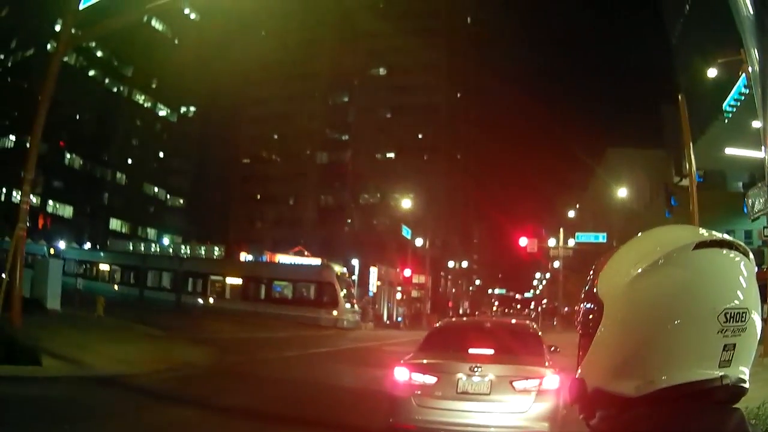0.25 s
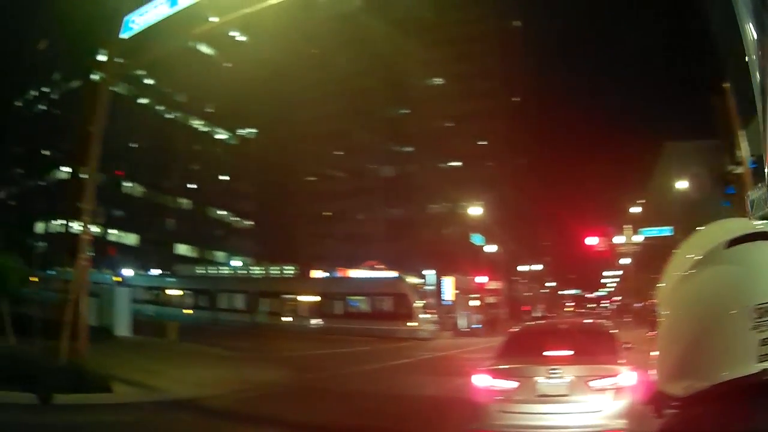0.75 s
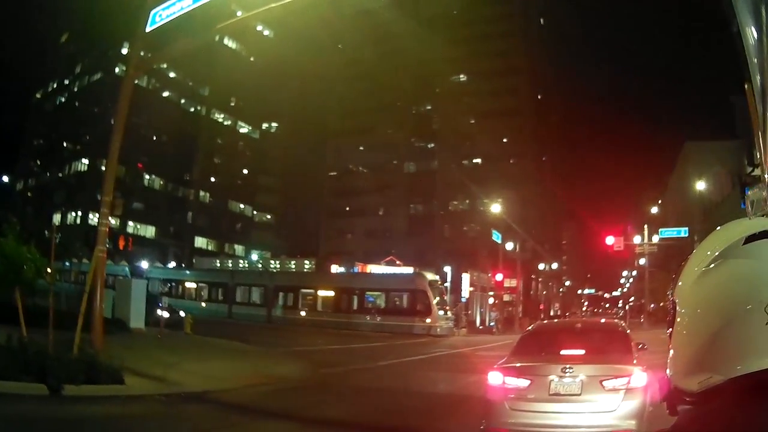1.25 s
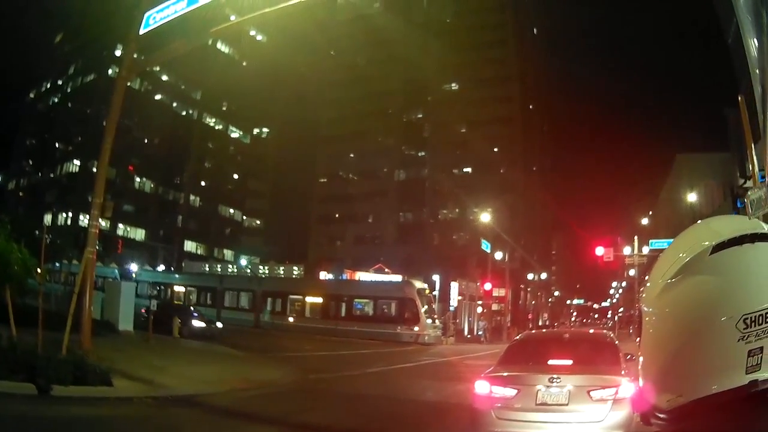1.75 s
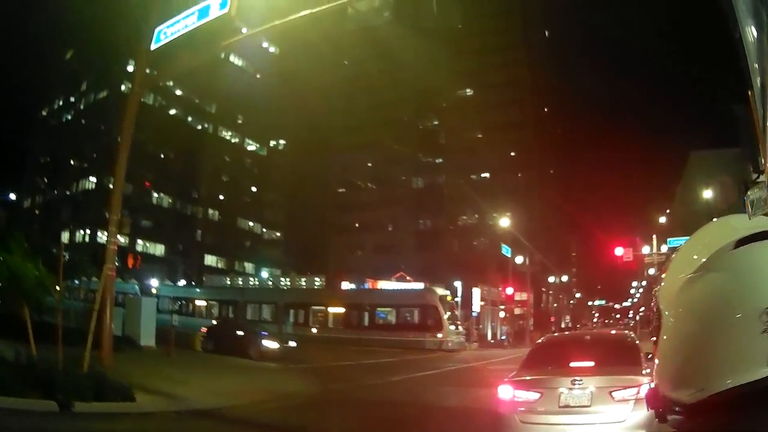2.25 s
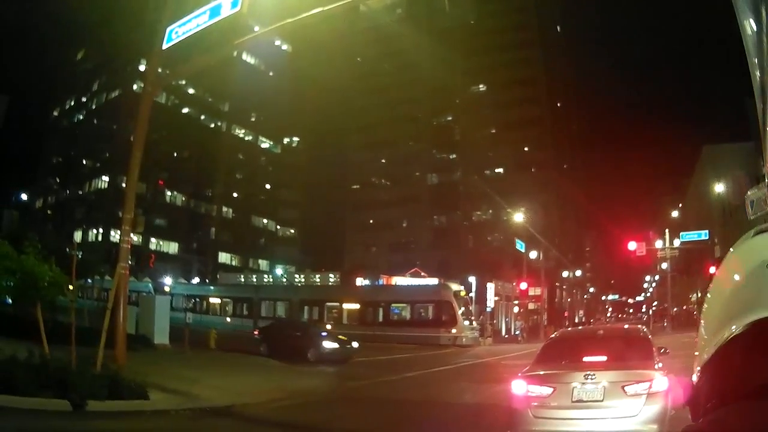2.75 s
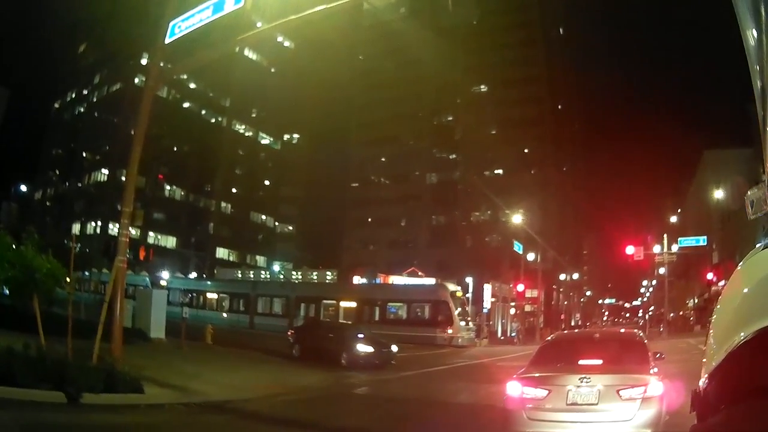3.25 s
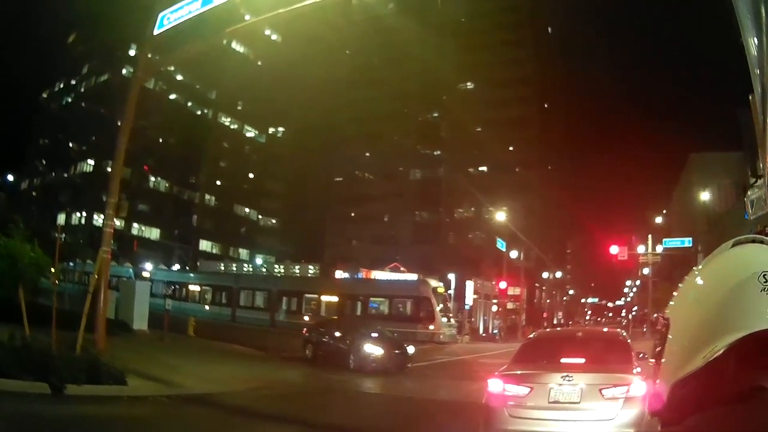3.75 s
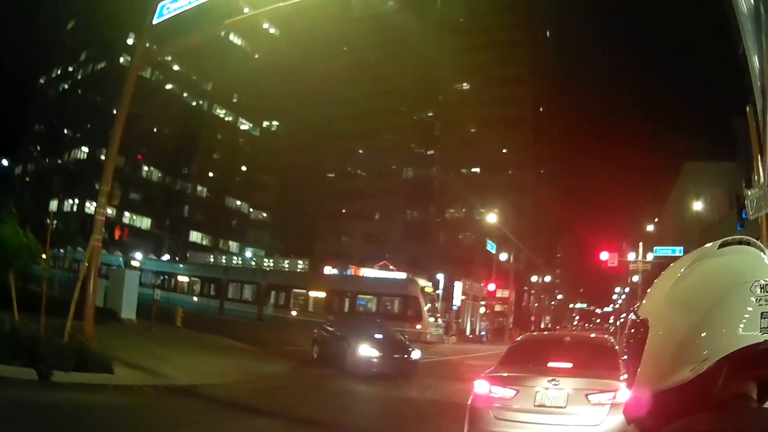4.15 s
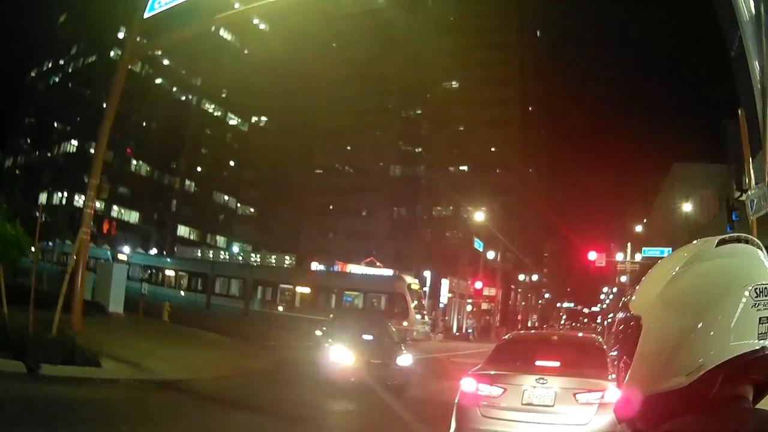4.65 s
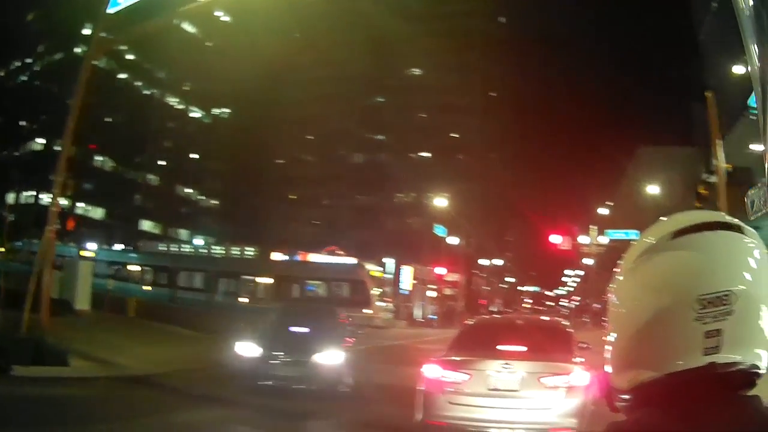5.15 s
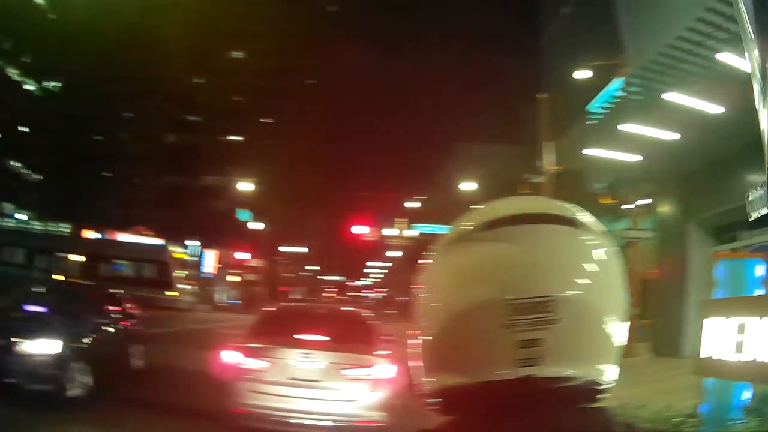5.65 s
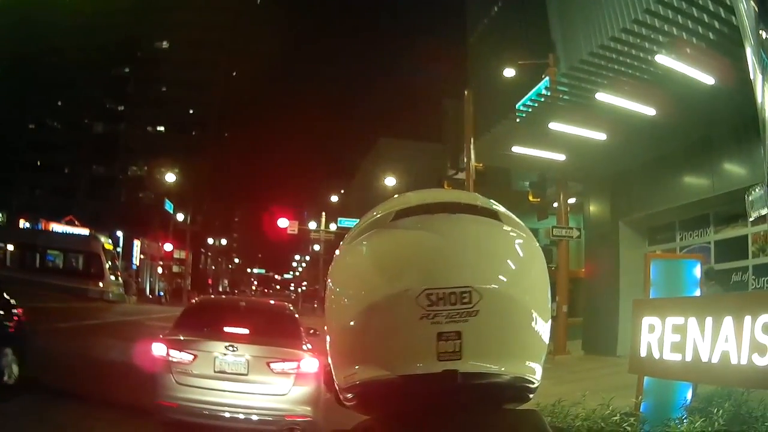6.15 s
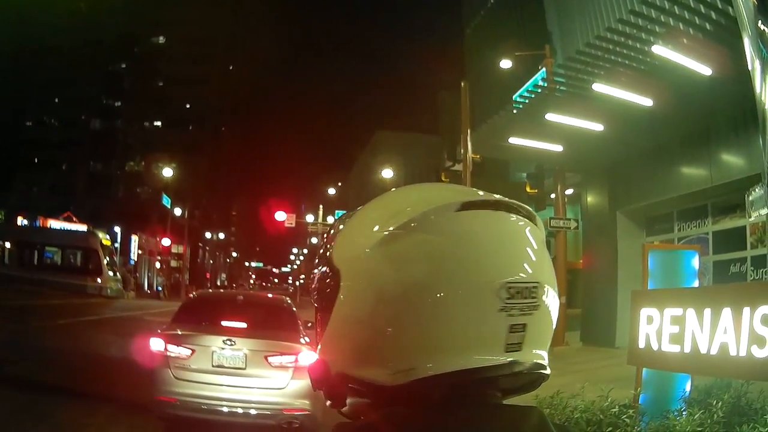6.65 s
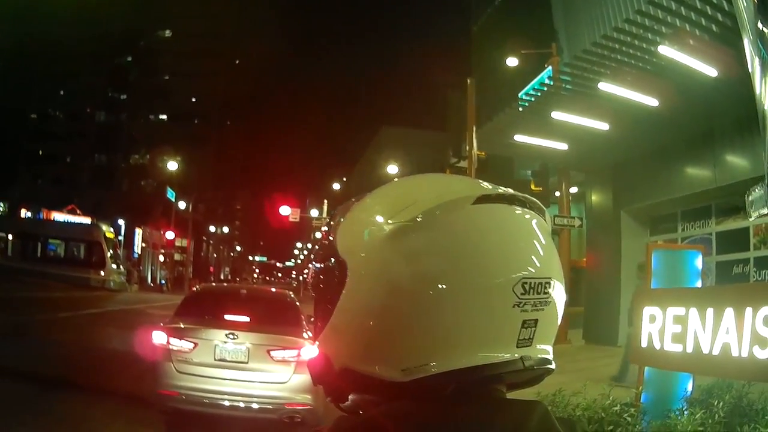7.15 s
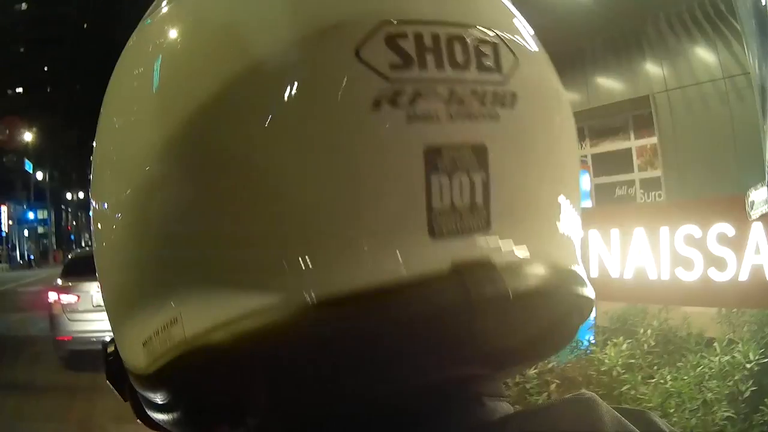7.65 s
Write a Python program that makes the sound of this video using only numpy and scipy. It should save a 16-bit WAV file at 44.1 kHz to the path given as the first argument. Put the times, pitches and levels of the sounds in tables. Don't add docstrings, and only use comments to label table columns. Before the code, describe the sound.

A long, slightly hunting motorcycle idle fills most of the scene, low and muffled with dry mechanical clatter; cars swish by faintly. Then comes a quick nudge, a sudden bark of revs with clustered exhaust pops, a rapid drop almost to stalling, a recovery and a final throttle opening. Outdoors in a city at night, dull mono camera microphone with steady hiss that creeps up and down.

```python
import sys
import numpy as np
from scipy import signal
from scipy.io import wavfile
from scipy.ndimage import uniform_filter1d

SR = 44100
rng = np.random.default_rng(int(sys.argv[2]) if len(sys.argv) > 2 else 0)


def elevation(decibels):
    levels = np.asarray(decibels, float)
    return 10 ** (levels / 20)


def file_out(sig):
    cols = np.atleast_2d(sig).T
    lim = np.clip(cols, -1, 1)
    pcm = np.round(lim * 32767).astype(np.int16)
    wavfile.write(sys.argv[1], SR, pcm)


N = 348831

# (time [s], length [s], depth [dB])
MISFIRES = [
    (2.812, .014, -16),
    (4.13, .015, -20),
    (6.212, .016, -12),
    (6.51, .022, -5),
    (6.672, .02, -5),
    (7.405, .012, -8),
]
LATE = .146


def unit(x):
    return x / np.sqrt(np.mean(x ** 2))


def band(x, lo_hz, hi_hz, order=2):
    return signal.sosfilt(signal.butter(order, [lo_hz, hi_hz], "bandpass", fs=SR, output="sos"), x)


def ring(x, modes):
    out, sign = 0, 1
    for hz, width, db in modes:
        out = out + sign * elevation(db) * band(x, hz - width / 2, hz + width / 2, order=1)
        sign = -sign
    return out


def walk(rate):
    hold = int(SR / rate)
    steps = np.repeat(rng.standard_normal(N // hold + 1), hold)
    return unit(uniform_filter1d(uniform_filter1d(steps, hold), hold)[:N])


def bumps(t, rows):
    return sum(size * np.exp(-((t - s) / length) ** 2) for s, length, size in rows)


def throttle(t):
    # (time [s], firing rate [Hz], first order [dB], valve gear [dB])
    idle = [(0, 39.66, -37, -56.5), (0.181, 40.14, -34, -55.5), (.4, 37.5, -36, -57.5),
            (.67, 40.5, -32, -55), (.82, 37.92, -34.5, -57), (1.0, 37.84, -34, -54),
            (1.15, 39.74, -33, -56), (1.33, 37.25, -35, -57), (1.549, 40.16, -32.5, -55),
            (1.801, 37.38, -36, -58), (2.2, 38.06, -33.5, -56), (2.5, 39.58, -33.5, -56.5),
            (3.2, 39.97, -34, -57), (3.701, 38.6, -34.5, -57), (4.4, 40.5, -33.5, -58.5),
            (4.7, 39.14, -35, -58), (5.35, 39, -35, -58), (5.699, 40.3, -32, -53.5)]
    nudge = [
        (5.9, 37.6, -35, -56),
        (6.05, 41, -33, -52.5),
        (6.1, 46.6, -29, -52.5),
        (6.14, 49.74, -21.5, -50),
        (6.18, 51, -25.5, -53.5),
        (6.22, 44.2, -28.5, -51.5),
    ]
    blip = [
        (6.259, 50.07, -31.5, -52),
        (6.29, 73.26, -14, -42),
        (6.32, 88.1, -22.5, -43),
        (6.361, 97.3, -20, -44.5),
        (6.44, 93, -17, -46.5),
        (6.521, 78.91, -19.5, -48.5),
        (6.6, 72.7, -19.5, -47.5),
        (6.68, 56.05, -21.5, -49),
        (6.775, 44.47, -24, -49.5),
    ]
    stumble = [
        (6.81, 35.97, -31.5, -51.5),
        (6.87, 25.66, -41, -56),
        (6.97, 24.7, -52, -61),
        (7.05, 42.92, -36, -56),
        (7.098, 43.8, -34, -57.5),
        (7.16, 41.96, -30.5, -55),
        (7.25, 47, -27, -53.5),
        (7.3, 44.5, -31.5, -54),
        (7.42, 36.16, -35, -57),
    ]
    pull = [
        (7.47, 37.52, -36, -57),
        (7.619, 37.15, -38.5, -59),
        (7.665, 44, -35.5, -55.5),
        (7.685, 45.8, -25, -50.5),
        (7.82, 48.54, -22, -46.5),
        (7.871, 52.87, -22, -47.5),
        (7.91, 55.5, -20, -47),
    ]
    s, *controls = np.transpose(np.vstack([idle, nudge, blip, stumble, pull]))
    hz, first_db, gear_db = (np.interp(t, s, c) for c in controls)
    sag = bumps(t, [(at + 0.082, 0.0497, 2.2) for at, _, _ in MISFIRES[:2]])
    return hz - sag, first_db - 1.2 * sag, gear_db


def upper_orders(t, hz, first_db, climb):
    # (firing rate [Hz], second order over first [dB], third order over first [dB])
    silencer = [(24.92, 10, 3), (37.5, 2, -8), (40.5, -0.27, -10), (46.2, -2, -17.5), (51, -12.5, -17),
                (64.5, -31, -31), (76.5, -27.5, -28.5), (97, -26.5, -16)]
    # (time [s], length [s], depth [dB])
    soft_burns = [
        (6.191, 0.041, -9),
        (6.97, .025, -25),
        (7.316, 0.034, -11),
    ]
    sharp_db = 0.0255 * climb + bumps(t, soft_burns)
    rates, *uppers = np.transpose(silencer)
    return [first_db + np.interp(hz, rates, c) + sharp_db for c in uppers]


def hum(t, turns, hz, orders_db):
    chance = rng.standard_normal((int(turns[-1]) + 2, 3))
    scatter_db = [.9 * np.interp(turns, np.arange(len(chance)), c) for c in chance.T]
    miss_db = bumps(t, MISFIRES)
    first, second, third = (elevation(db + own + miss_db) for db, own in zip(orders_db, scatter_db))
    pair = 1 + np.interp(hz, [40, 88, 94], [.15, .13, .27]) * np.cos(np.pi * turns)
    angle = 2 * np.pi * turns
    dip = angle - 2 * np.pi * LATE
    low = first * np.cos(angle) + second * np.cos(2 * angle + 2.35)
    fourth = np.interp(4 * hz, [165, 185], [.55, .15])
    high = third * (np.cos(3 * dip) + fourth * np.cos(4 * dip))
    return np.sqrt(2) * pair * (low - high)


def burble(turns, hz, effort_db, idle_hz):
    ragged = uniform_filter1d(np.tanh(((hz - idle_hz) / 2.2) ** 2), size=SR // 8)
    level_db = -47 + 10 * ragged + 0.37 * effort_db
    lumps = 1 + .6 * np.cos(2 * np.pi * turns)
    return elevation(level_db) * unit(lumps * band(rng.standard_normal(N), 32, 115, order=4))


def bark(turns, hz, effort_db, climb, idle_hz):
    # (pitch [Hz], width [Hz], level [dB])
    pipe = [(191.8, 35, -1), (240.4, 46, 1), (290.4, 41, -2.5), (344.4, 61.5, -6)]
    firing = turns - LATE + .32
    at = np.flatnonzero(np.diff(np.floor(firing)))
    chance = rng.standard_normal((len(at), 2))
    pair_db = np.interp(hz[at], [40, 90], [2.5, 6.0]) * (-1) ** np.arange(len(at))
    slip = (.0003 * SR * chance[:, 0]).astype(int)
    pulses = np.zeros(N)
    pulses[np.clip(at + slip, 0, N - 1)] = elevation(1.5 * chance[:, 1] + pair_db) / np.sqrt(hz[at])
    gas = rng.standard_normal(N) * (.6 + np.exp(-(firing % 1) / .4))
    tone = unit(ring(pulses, pipe)) + elevation(-1.5) * unit(ring(gas, pipe))
    level_db = -49 + 1.05 * np.maximum(effort_db, -6)
    level_db = level_db - 1.5 * np.log2(np.maximum(hz / idle_hz, 1)) + 0.0043 * climb
    return elevation(level_db) * unit(band(tone, 140, 421, order=3))


def clatter(t, turns, gear_db, climb):
    # (pitch [Hz], level per Hz [dB])
    colour = [(260, -33), (450, 0), (621, -5), (807, -4.5), (875, -1), (930, -2), (1510, -0.5),
              (1840, -9.5), (2190, -9.5), (3020, -17), (5000, -24), (6500, -49), (11000, -120)]
    # (time [s], length [s], lift [dB])
    passing = [
        (3.48, .1, 3),
        (4.498, 0.088, 3),
        (4.948, 0.1, 1),
    ]
    treble_db = .6 - .006 * np.maximum(climb, 0)
    hz, db = np.transpose(colour)
    out, shared = 0, walk(14)
    throb_db = 0.81 * np.cos(2 * np.pi * turns - 2.4) + 0.39 * np.cos(np.pi * turns)
    for centre in 480 * 2 ** np.arange(0, 3.5, 1 / 3):
        band_db = np.interp(np.log(centre), np.log(hz), db) + 10 * np.log10(centre)
        band_db = band_db + .9 * shared + .9 * walk(7)
        band_db = band_db + treble_db * np.clip(np.log2(centre / 1700), 0, 1)
        noise = unit(band(rng.standard_normal(N), centre * 0.839, centre * 1.053))
        out = out + elevation(band_db + throb_db) * noise
    return elevation(gear_db - 0.5 + bumps(t, passing)) * unit(out)


def street():
    return elevation(-55 + 2 * walk(3)) * unit(band(rng.standard_normal(N), 18, 160))


def gain_control(t):
    # (let-go time [s], creep [s], lift [dB])
    creeps = [
        (3.9, 0.24, 2),
        (4.55, 0.15, 2),
        (5.73, 0.32, 2),
        (6.22, .3, 1.7),
        (6.82, 0.19, 3.2),
        (7.29, .2, 0),
    ]
    lift_db = sum(db * np.exp(np.minimum(t - s, 0) / creep) * (t < s) for s, creep, db in creeps)
    return lift_db + 3.3 * np.clip((t - 7.665) / .03, 0, 1)


def hiss(t, turns, gear_db):
    level_db = -63 + gain_control(t) + 0.074 * (gear_db - np.median(gear_db))
    throb_db = .3 * np.cos(2 * np.pi * turns) + .3 * np.cos(np.pi * turns) + .5 * walk(12)
    return elevation(level_db + throb_db) * rng.standard_normal(N)


def bracket(t):
    # (time [s], length [s], pitch [Hz], level [dB])
    swells = [
        (6.135, .025, 940, -54),
        (6.197, .02, 972, -48.5),
    ]
    return sum(elevation(db) * np.exp(-((t - s) / length) ** 2) * np.sin(2 * np.pi * hz * t)
               for s, length, hz, db in swells)


def pops():
    # (time [s], peak level [dB], crack over knock [dB])
    afterfire = [
        (6.2725, -17, -28),
        (6.289, -22, -20),
        (6.300, -13, -25),
        (6.3237, -13, -19.5),
        (6.339, -26, -18),
        (6.357, -26, -20),
        (6.4093, -23, -18),
    ]
    # (pitch [Hz], width [Hz], level [dB])
    silencer_ring = [(250, 70, -1), (375, 80, -1), (170, 60, -6)]
    age = np.arange(SR // 10) / SR
    push = np.exp(-((age - .001) / .0006) ** 2)
    knock = band(ring(push, silencer_ring), 100, 600)
    swell = (age / .004 * np.exp(1 - age / .004)) ** 2
    out = np.zeros(N)
    for s, db, crack_db in afterfire:
        crack = unit(band(rng.standard_normal(len(age)), 550, 2000, order=3)) * swell
        at = int(s * SR)
        out[at:at + len(age)] += elevation(db) * (knock / knock.max() + elevation(crack_db) * crack)
    return out


def scene():
    t = np.arange(N) / SR
    idle_hz, idle_hum_db = 39, -31
    hz, first_db, gear_db = throttle(t)
    climb = uniform_filter1d(np.gradient(hz) * SR, size=SR // 25)
    second_db, third_db = upper_orders(t, hz, first_db, climb)
    effort_db = 10 * np.log10(elevation(2 * first_db) + elevation(2 * second_db)) - idle_hum_db
    turns = np.cumsum(hz * (1 + .006 * walk(25))) / SR
    exhaust = hum(t, turns, hz, (first_db, second_db, third_db))
    exhaust = exhaust + burble(turns, hz, effort_db, idle_hz)
    exhaust = exhaust + bark(turns, hz, effort_db, climb, idle_hz) + pops()
    mix = exhaust + clatter(t, turns, gear_db, climb) + bracket(t) + street() + hiss(t, turns, gear_db)
    return mix[None]


def roll_off(x):
    return signal.sosfilt(signal.butter(12, 15740, fs=SR, output="sos"), x)


def record(dry):
    top_hz = 15500
    finished = signal.sosfilt(signal.butter(1, 1.2 * top_hz, fs=SR, output="sos"), dry)
    return roll_off(finished)


dry = scene()
out = record(dry)
file_out(out)
```